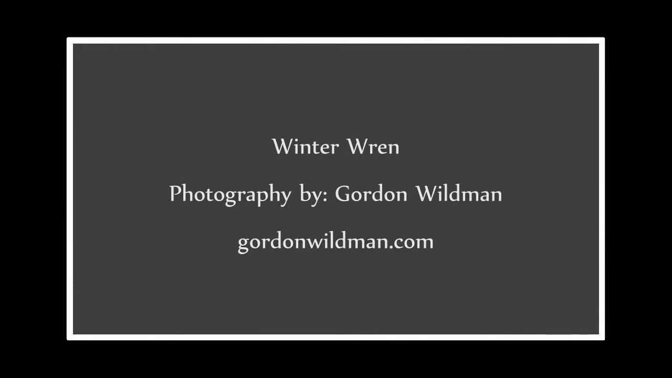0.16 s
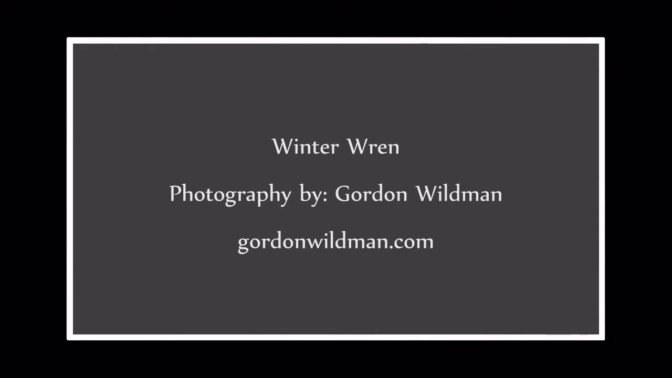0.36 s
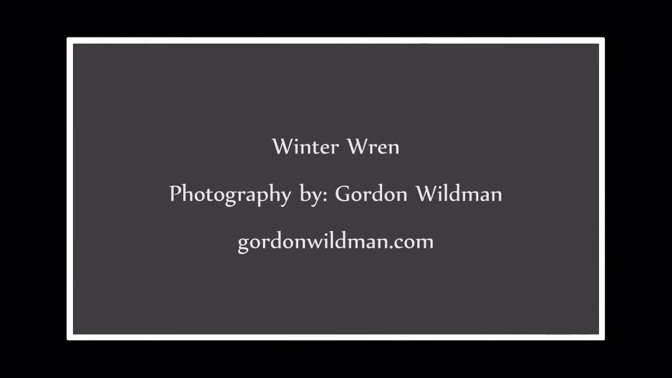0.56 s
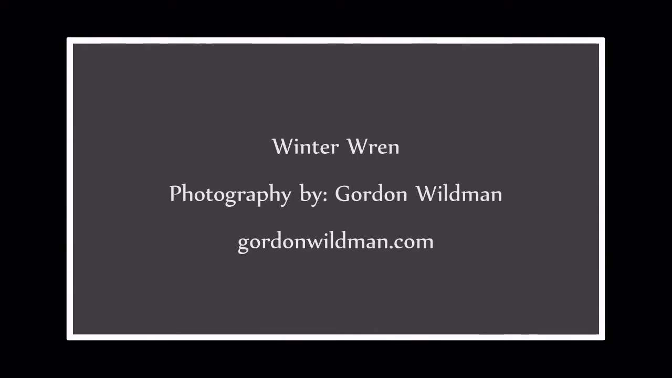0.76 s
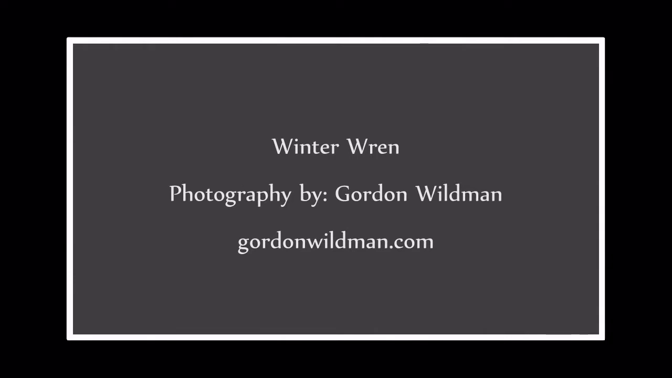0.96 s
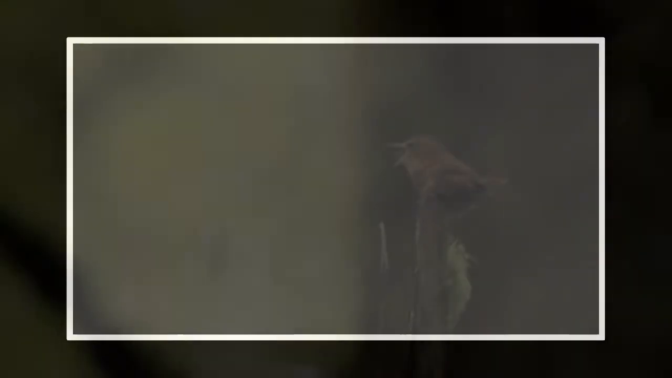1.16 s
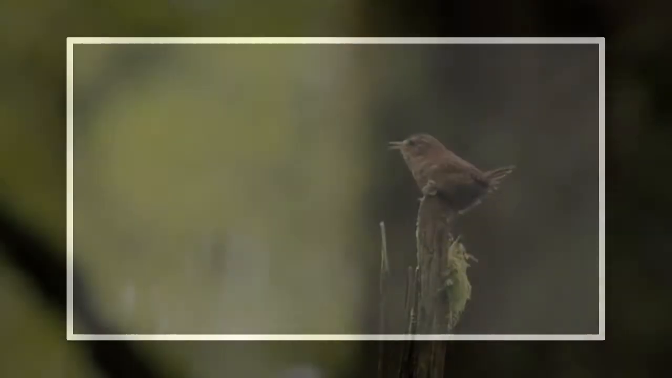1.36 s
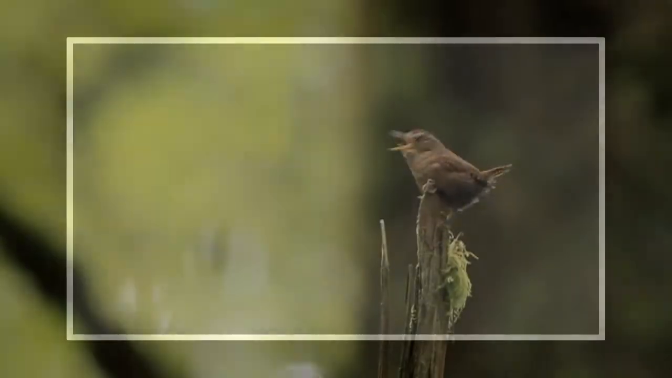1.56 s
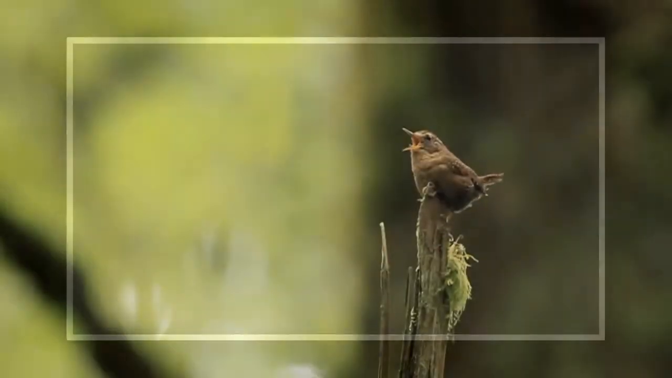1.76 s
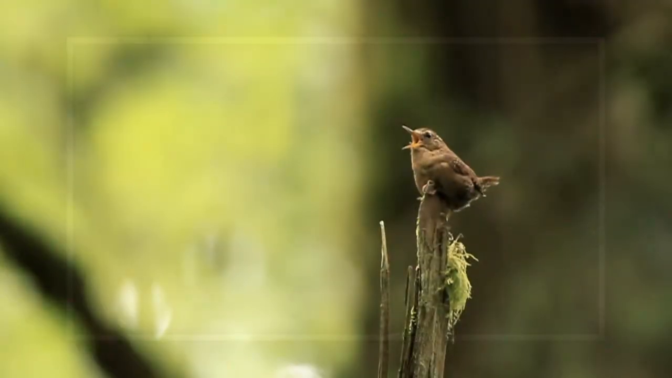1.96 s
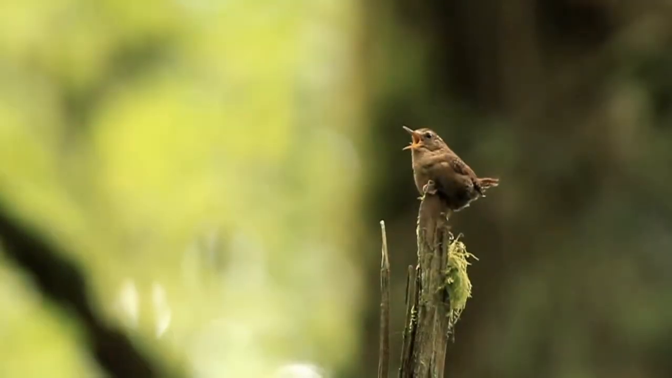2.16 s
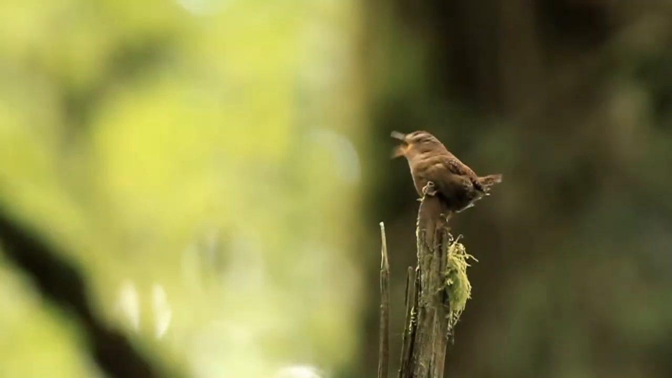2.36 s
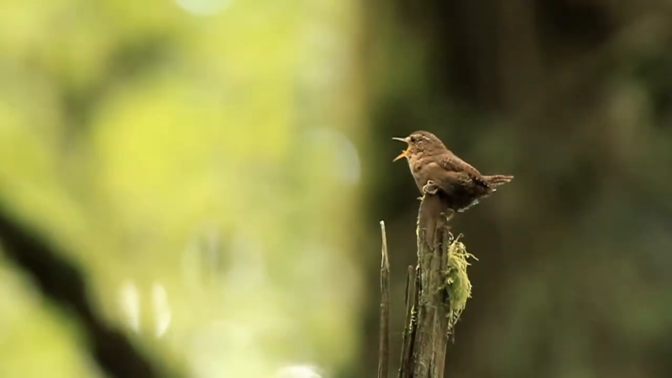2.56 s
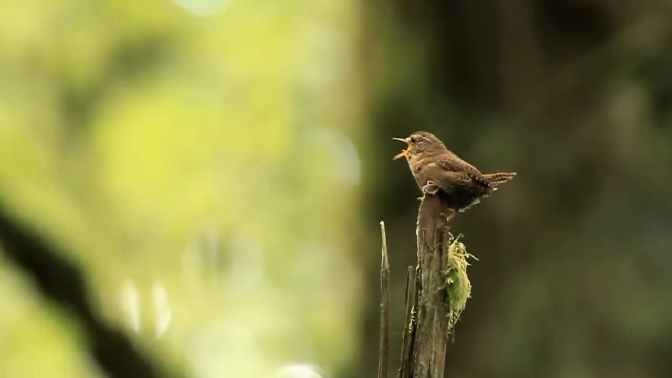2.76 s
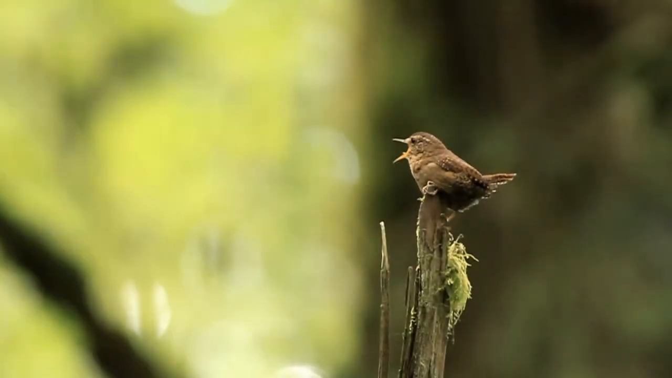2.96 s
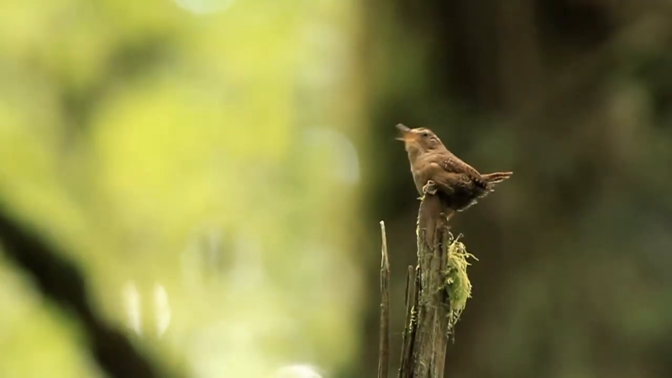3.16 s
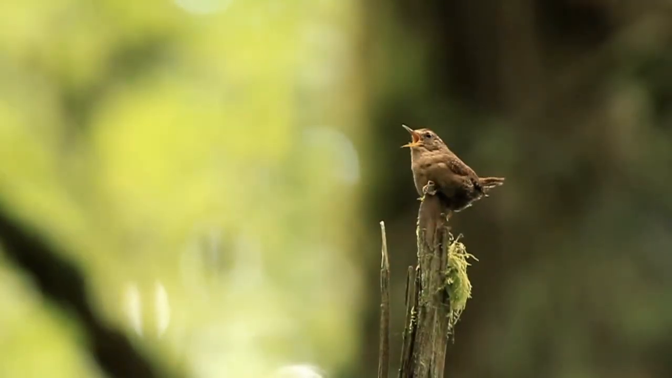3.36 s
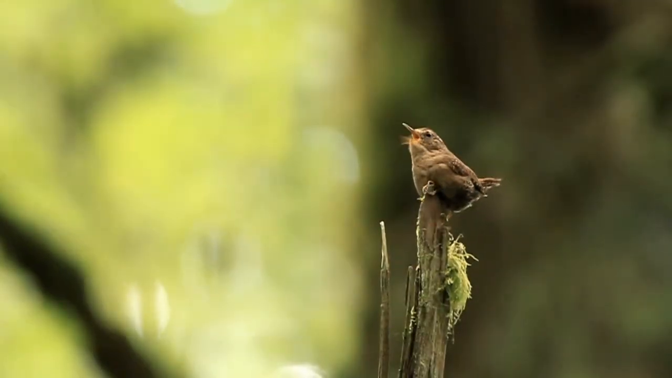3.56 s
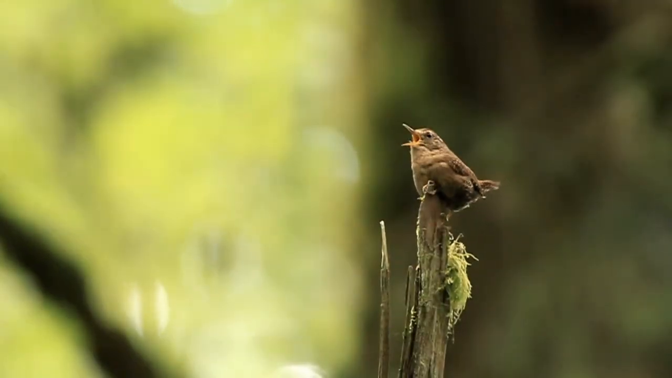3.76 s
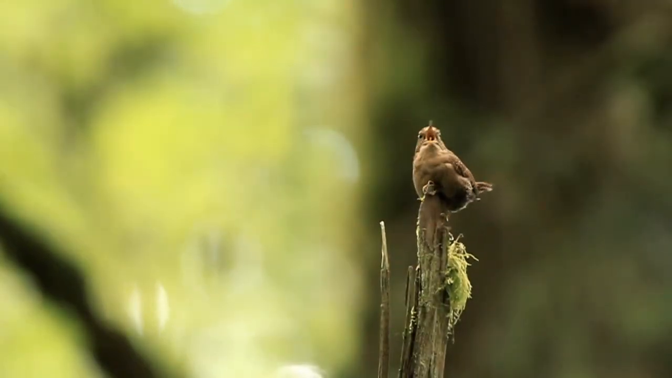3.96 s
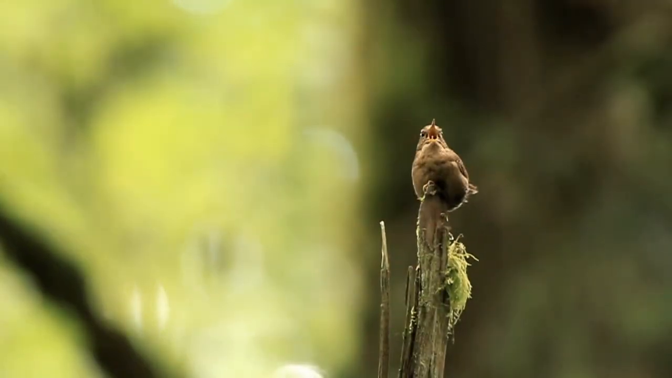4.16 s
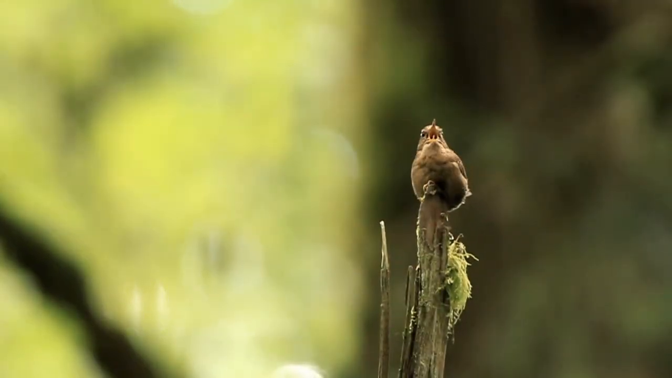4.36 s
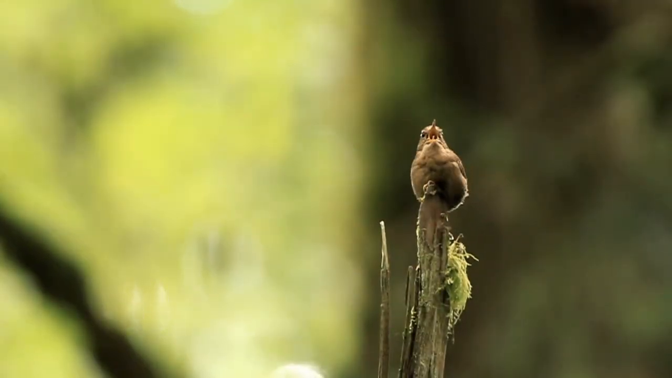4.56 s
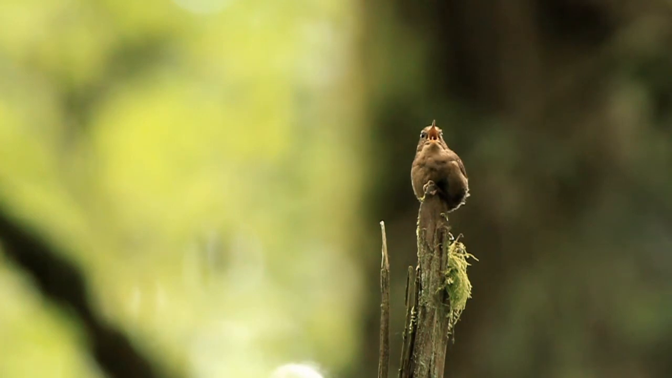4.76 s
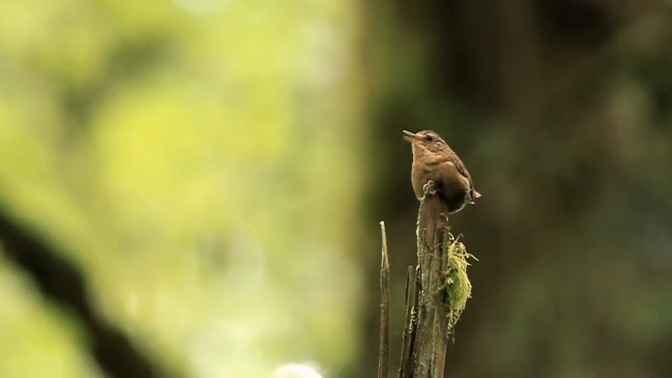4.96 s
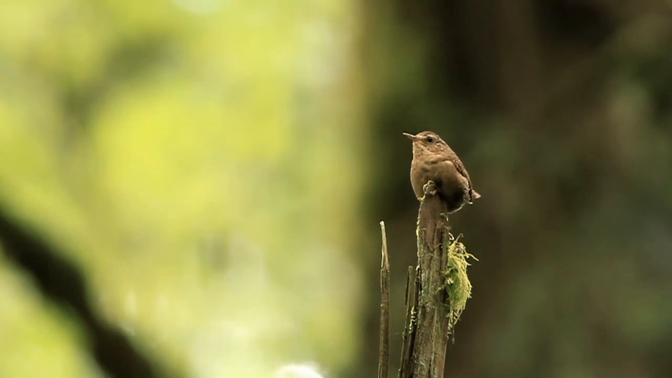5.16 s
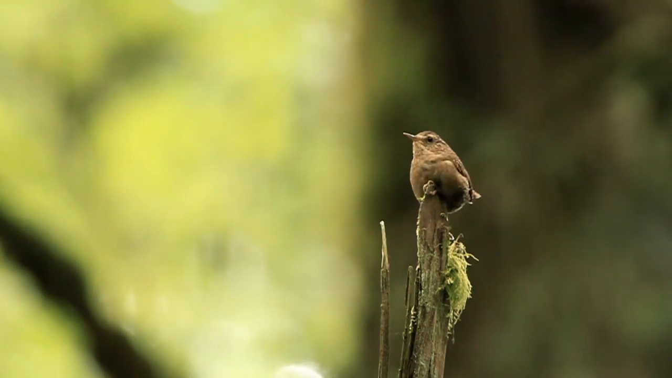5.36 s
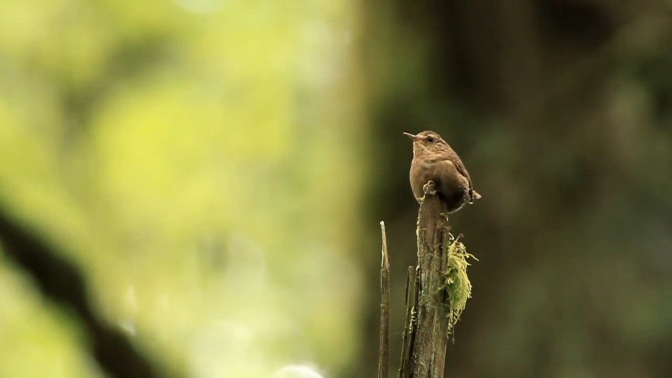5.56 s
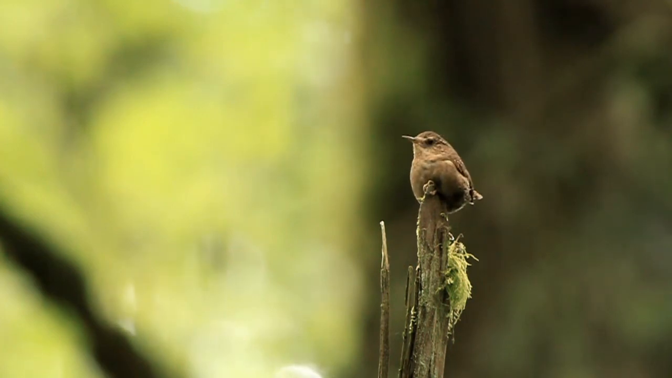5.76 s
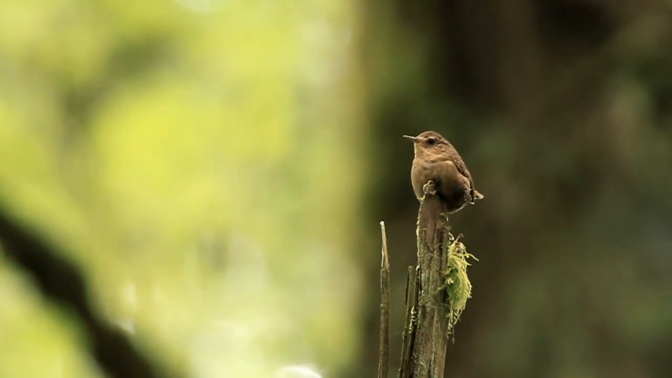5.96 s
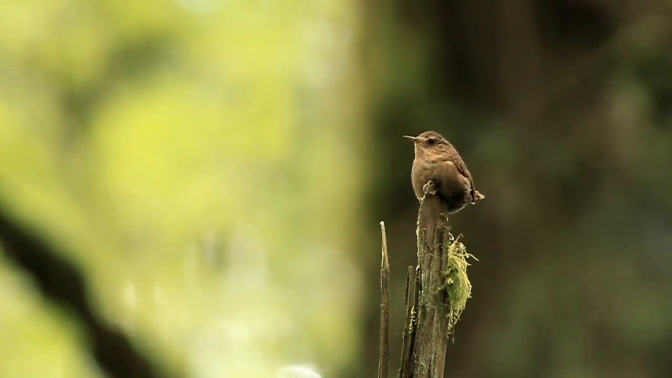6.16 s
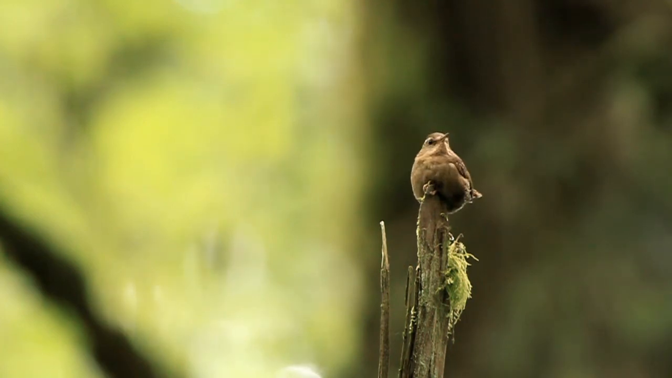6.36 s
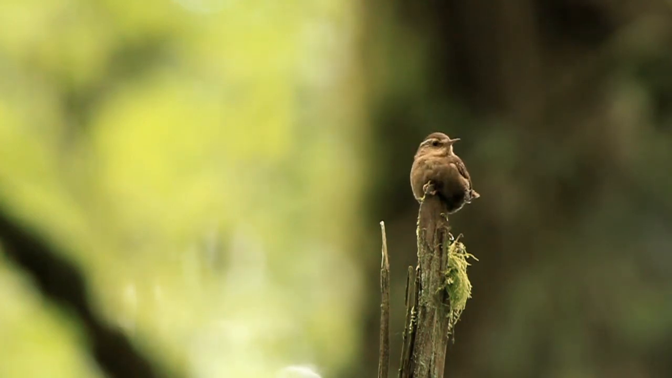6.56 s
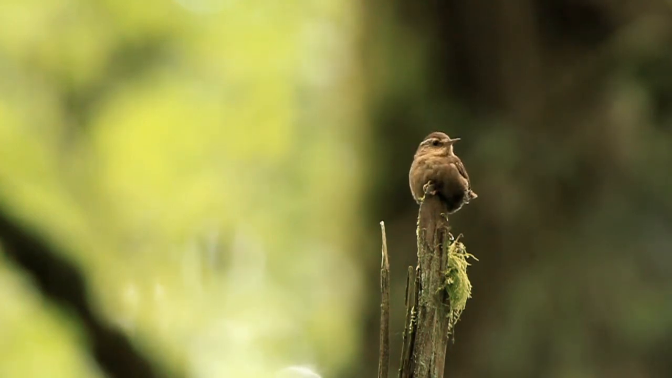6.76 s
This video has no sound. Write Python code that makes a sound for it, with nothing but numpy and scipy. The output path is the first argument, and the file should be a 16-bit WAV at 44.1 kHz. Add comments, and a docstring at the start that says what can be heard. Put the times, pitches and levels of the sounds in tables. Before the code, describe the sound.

Silence opens suddenly with a click at right into quiet forest air. A single small bird sings loudly and brilliantly, dozens of sharp sweeping notes a second or so apart in phrases: scattered chips, a steady roll, quick trills, and a slower closing roll. Woodland scatter leaves a short airy tail. After it ends, faint hiss remains with two soft far bird notes, a vague low rumble, a tick and a small mechanical whir. Mono-like outdoor pickup.

```python
"""After about 1 s of silence the sound opens abruptly, with a pop on the right and a faint hiss, on a wren's song.
The wren sings swept near-sine syllables, chips, rolls, trills and two fluttered buzzes; echoes and decaying
noise scatter them back as trunks would. Two soft motor whirs, noise with unsteady tones, start during the song.
Then a far bird gives two blurred slurs, a low rumble comes and goes, a noise burst ticks and a third whir runs."""
import sys
import numpy as np
from scipy import signal
from scipy.fft import rfft, irfft
from scipy.io import wavfile
from scipy.ndimage import uniform_filter1d

SR = 44100
rng = np.random.default_rng(int(sys.argv[2]) if len(sys.argv) > 2 else 0)


def transcribe(u):
    """Save the signal u as a 16-bit wav file named by the first command-line argument.

    u: samples, shape (n,) or (channels, n), limited to [-1, 1]; the rate is SR.
    q: integer samples, one column per channel.
    """
    v = np.clip(np.atleast_2d(u).T, -1, 1)
    q = np.round(v * 32767).astype(np.int16)
    wavfile.write(sys.argv[1], SR, q)


N = 300071
TIME = np.arange(N) / SR


def from_db(db):
    """Decibels to gain."""
    return 10 ** (np.asarray(db) / 20)


def rms_one(x):
    """Scale to an rms of 1."""
    return x / np.sqrt(np.mean(x ** 2) + 1e-20)


def drift(rate_hz):
    """Random fluctuation below rate_hz, rms 1."""
    lowpass = signal.butter(2, rate_hz, fs=SR, output="sos")
    return rms_one(signal.sosfilt(lowpass, rng.standard_normal(N)))


def noise(spectrum):
    """Steady noise shaped by a (f/Hz, level/dB) spectrum, rms 1."""
    hz, db = np.transpose(spectrum)
    bins_hz = np.maximum(np.fft.rfftfreq(N, 1 / SR), 1)
    gain = from_db(np.interp(np.log(bins_hz), np.log(hz), db))
    return rms_one(irfft(rfft(rng.standard_normal(N)) * gain, N))


def gate(start_s, end_s, fade_s):
    """1 between start and end, with straight fades inside."""
    return np.clip(np.minimum(TIME - start_s, end_s - TIME) / fade_s, 0, 1)


def progress(length_s):
    """Runs from 0 to 1 over a note."""
    return np.linspace(0, 1, max(int(length_s * SR), 2))


def envelope(length_s, attack_s, release_s):
    """Straight attack, hold and release of a note."""
    t = progress(length_s) * length_s
    return np.clip(np.minimum(t / attack_s, (length_s - t) / release_s), 0, 1)


def slur(start_s, length_s, first_hz, middle_hz, last_hz, fade_s, db):
    """The pitch bends once, along a parabola. Every note is (start, pitch, strength)."""
    bend = np.polyfit([0, .5, 1], [first_hz, middle_hz, last_hz], 2)
    hz = np.polyval(bend, progress(length_s))
    return start_s, hz, from_db(db) * envelope(length_s, fade_s, fade_s)


def whistle(start_s, length_s, turn_a_s, turn_b_s, first_hz, a_hz, b_hz, last_hz, db,
            attack_s=.010, release_s=.005, rounding_s=.008, max_sag=.09):
    """Three glides joined by rounded turns; low air pressure sags the pitch at onset and release."""
    pressure = envelope(length_s, attack_s, release_s)
    t = progress(length_s) * length_s
    hz = np.interp(t, [0, turn_a_s, turn_b_s, length_s], [first_hz, a_hz, b_hz, last_hz])
    hz = uniform_filter1d(hz, int(rounding_s * SR), mode="nearest")
    sag = max_sag * (1 - pressure) ** 2
    return start_s, hz * (1 - sag), from_db(db) * pressure


CHIP_TURN_SHARE = .35  # share of the chip before its pitch turns


def chip(start_s, length_s, top_hz, bottom_hz, db, bow=.8, down_db=-5, turn_db=-25):
    """The pitch plunges and springs back; the syrinx nearly closes at the turn."""
    u, turn = progress(length_s), CHIP_TURN_SHARE
    height = np.interp(u, [0, turn, 1], [1, 0, 1]) ** bow  # bow < 1: sharper V
    # downstroke and turn levels are relative to the upstroke
    strokes = np.interp(u, [0, turn / 2, turn, (1 + turn) / 2, 1],
                        [0, from_db(down_db), from_db(turn_db), 1, 0])
    return start_s, bottom_hz + (top_hz - bottom_hz) * height, from_db(db) * strokes


def repeated(motif, beats):
    """The same few notes on every beat, each beat with its own pitch ratio and gain."""
    notes = []
    for beat_s, pitch_ratio, gain_db in beats:
        for start_s, hz, strength in motif:
            notes.append((beat_s + start_s, pitch_ratio * hz, from_db(gain_db) * strength))
    return notes


# All note levels are relative, before the beak and voice gains.
# Slurs sung once: t/s, length/s, first f/Hz, middle f/Hz, last f/Hz, fade/s, level/dB
SINGLE_SLURS = [ (.984, .049, 8100, 6050, 3850, .007, -14.5), (1.052, .007, 5500, 6050, 6300, .003, -20),
                (1.062, .007, 6000, 6100, 5900, .003, -14), (1.189, .006, 5800, 6350, 6400, .003, -12),
                (1.199, .007, 6300, 6620, 6600, .003, -13), (1.337, .036, 3280, 3230, 2600, .013, -12.5),
                (1.371, .014, 2900, 3560, 3500, .006, -15), (1.495, .032, 4500, 4050, 3950, .005, -12.5),
                (1.573, .008, 5300, 4200, 3400, .003, -14), (1.582, .007, 4300, 3500, 3000, .003, -18),
                (1.592, .007, 4700, 3850, 3350, .003, -13), (1.601, .014, 4100, 4700, 4450, .004, -12),
                (1.672, .084, 7600, 7620, 7350, .012, -13), (1.779, .009, 5200, 7000, 7650, .004, -8),
                (1.788, .023, 7750, 7550, 6700, .008, -12), (1.932, .021, 6500, 8100, 7950, .005, -12),
                (2.074, .021, 6500, 8150, 8000, .005, -13), (2.217, .031, 4100, 3830, 3430, .003, -12),
                (2.263, .054, 3800, 4560, 4050, .027, -4), (2.446, .032, 5400, 5130, 6000, .011, -9),
                (3.036, .017, 5050, 4350, 4100, .003, -14), (3.056, .016, 3900, 4750, 4500, .006, -7),
                (3.073, .026, 4200, 4050, 3450, .008, -13.5), (3.113, .017, 4300, 3950, 3350, .005, -12),
                (3.133, .018, 4100, 4680, 4000, .005, -12), (3.155, .023, 4050, 3750, 3400, .006, -18),
                (3.295, .008, 5400, 6200, 6500, .004, -11), (3.305, .006, 6400, 5900, 5100, .003, -19),
                (3.407, .017, 4480, 4250, 3750, .005, -11), (3.428, .088, 4200, 4500, 4850, .008, -23),
                (3.5365, .010, 4500, 5480, 4700, .004, -4.5), (3.549, .022, 4950, 4300, 3700, .005, -5.7),
                (3.575, .017, 4300, 4980, 5350, .003, -9.5), (4.038, .039, 6700, 5650, 4350, .02, -7),
                (4.101, .049, 6550, 7530, 5700, .009, -7.8), (4.156, .024, 7600, 7300, 6300, .012, -13)]
# Whistles sung once: t/s, length/s, turn A after/s, turn B after/s, first f/Hz, A f/Hz, B f/Hz, last f/Hz,
# level/dB; pitches before rounding and sag
SINGLE_WHISTLES = [ (1.089, .082, .018, .032, 7900, 6550, 7900, 3850, -12.5),
                   (1.226, .089, .021, .034, 7750, 6750, 8400, 4200, -13),
                   (1.406, .069, .036, .052, 5500, 6350, 7450, 5600, -12.5),
                   (1.541, .031, .013, .023, 4750, 5000, 5550, 3550, -11.5),
                   (1.640, .040, .009, .024, 9300, 7500, 8450, 7600, -7),
                   (2.351, .077, .041, .057, 7100, 7050, 7550, 5900, -13.3),
                   (2.805, .092, .034, .056, 7850, 7800, 8200, 6500, -13.5),
                   (2.962, .047, .009, .022, 6950, 6300, 7250, 6300, -14),
                   (3.200, .077, .022, .052, 5400, 7000, 4300, 5900, -8.5),
                   (3.329, .056, .013, .027, 6300, 8950, 6800, 8000, -9),
                   (3.610, .068, .021, .039, 6600, 9050, 7250, 8200, -10)]
# Lone chip: t/s, length/s, top f/Hz, bottom f/Hz, level/dB
SINGLE_CHIP = (2.937, .017, 7700, 5400, -8)


def singles():
    """Notes the syrinx sings once: slurs, whistles and a chip."""
    slurs = [slur(*row) for row in SINGLE_SLURS]
    whistles = [whistle(*row) for row in SINGLE_WHISTLES]
    return slurs + whistles + [chip(*SINGLE_CHIP)]


# Motifs: columns as for single notes, t/s after the beat; pitch and level before the beat's ratio and gain.
# Chip of the early roll: t/s, length/s, top f/Hz, bottom f/Hz, level/dB
EARLY_ROLL_CHIP = (0, .022, 8100, 4600, -6)
# Arching whistle: t/s, length/s, turn A/s, turn B/s, first f/Hz, A f/Hz, B f/Hz, last f/Hz, level/dB
EARLY_ROLL_ARCH = (.0385, .064, .018, .034, 8050, 7800, 8550, 7000, -8)
# Beats: t/s, pitch ratio, gain/dB
EARLY_ROLL_BEATS = [(1.810, 1, 1), (1.9515, 1, 0), (2.0935, .995, -.5)]


def early_roll():
    """Chip and arching whistle on every beat."""
    return repeated([chip(*EARLY_ROLL_CHIP), whistle(*EARLY_ROLL_ARCH)], EARLY_ROLL_BEATS)


# Slurs: t/s after the beat, length/s, first f/Hz, middle f/Hz, last f/Hz, fade/s, level/dB
TWO_SLUR_TRILL_SLURS = [(.001, .012, 3900, 5800, 4600, .006, -14.5),
                        (.016, .017, 7750, 7100, 6000, .006, -16.5)]
# Beats: t/s, pitch ratio, gain/dB
TWO_SLUR_TRILL_BEATS = [(2.4955, 1.02, .5), (2.539, 1.05, 1), (2.580, 1, 2), (2.6215, 1.04, -.5),
                        (2.6645, 1.03, 0), (2.708, 1, 1), (2.752, 1.01, -1.5)]


def two_slur_trill():
    """Two slurs on every beat."""
    return repeated([slur(*row) for row in TWO_SLUR_TRILL_SLURS], TWO_SLUR_TRILL_BEATS)


# Slurs: t/s after the beat, length/s, first f/Hz, middle f/Hz, last f/Hz, fade/s, level/dB
THREE_SLUR_TRILL_SLURS = [(.0015, .008, 5700, 6850, 7100, .002, -10.3),
                          (.0095, .009, 7400, 6800, 5100, .002, -11.3),
                          (.02, .016, 8050, 7680, 7200, .007, -10)]
# Beats: t/s, pitch ratio, gain/dB
THREE_SLUR_TRILL_BEATS = [(3.6945, 1.01, 1.5), (3.7445, 1.013, 0), (3.7935, .99, 1), (3.841, 1.003, .5),
                          (3.8895, 1, 1.5), (3.9385, .98, 1), (3.9875, .98, .5)]


def three_slur_trill():
    """Three slurs on every beat."""
    return repeated([slur(*row) for row in THREE_SLUR_TRILL_SLURS], THREE_SLUR_TRILL_BEATS)


# Lead-in slur: t/s after the beat, length/s, first f/Hz, middle f/Hz, last f/Hz, fade/s, level/dB
CLOSING_ROLL_SLUR = (0, .011, 5700, 7100, 7550, .005, -13.5)
# First chip, the deepest: t/s, length/s, top f/Hz, bottom f/Hz, level/dB
CLOSING_ROLL_CHIP = (.017, .020, 7650, 3900, -7.5)
# Arching whistle: t/s, length/s, turn A/s, turn B/s, first f/Hz, A f/Hz, B f/Hz, last f/Hz, level/dB
CLOSING_ROLL_ARCH = (.036, .066, .012, .028, 9350, 8050, 8750, 7200, -12.3)
# Beats: t/s, pitch ratio, gain/dB
CLOSING_ROLL_BEATS = [(4.2065, .995, 0), (4.328, 1, 1), (4.4475, 1, .5), (4.566, 1.025, .5), (4.693, 1, 0),
                      (4.8135, .985, 0)]


def closing_roll(lift_hz=210):
    """Slur, chip and arch on every beat; the chips grow shallower towards the end, and so shorter."""
    start_s, length_s, top_hz, deepest_hz, db = CLOSING_ROLL_CHIP
    notes = []
    for k, beat in enumerate(CLOSING_ROLL_BEATS):
        bottom_hz = deepest_hz + k * lift_hz  # before the beat's pitch ratio
        saved_s = length_s * (bottom_hz - deepest_hz) / (top_hz - deepest_hz)
        chip_start_s = start_s + saved_s * CHIP_TURN_SHARE
        shallower = chip(chip_start_s, length_s - saved_s, top_hz, bottom_hz, db)
        notes += repeated([slur(*CLOSING_ROLL_SLUR), shallower, whistle(*CLOSING_ROLL_ARCH)], [beat])
    return notes


def song():
    """All the wren's notes: single ones, two rolls and two trills."""
    return singles() + early_roll() + two_slur_trill() + three_slur_trill() + closing_roll()


# Syrinx flutter in the buzzes: start t/s, end t/s, rate/Hz, pitch swing/Hz, level swing/0-1
SYRINX_FLUTTER = [(1.662, 1.764, 205, 560, 0.08), (3.424, 3.52, 178, 453, 0.75)]
# Throat and beak response, favouring mid-range: f/Hz, level/dB
BEAK_RESPONSE = [(2700, -10), (3300, -6.5), (4000, -6.5), (4700, -3), (5500, -1.8), (6300, -1.8),
                 (7000, -4.3), (8000, -6.3), (8700, -13)]


def wren(jitter=0.006, shimmer_db=1.9, octave_db=-30, octave_tilt_db=12, octave_rough_rad=0.6, voice_db=-0.45):
    """The syrinx gives a near sine with a faint, rougher octave; buzzes are loudest as the pitch swings down."""
    swing_hz, pulsing, out = np.zeros(N), np.ones(N), np.zeros(N)
    for start_s, end_s, rate_hz, depth_hz, share in SYRINX_FLUTTER:
        cycle = 2 * np.pi * rate_hz * (TIME - start_s)
        on = gate(start_s, end_s, 0.01)
        swing_hz += on * depth_hz * np.cos(cycle)
        pulsing += on * share * np.sin(cycle)
    waver = 1 + jitter * drift(350)
    tremor = from_db(shimmer_db * drift(192))
    rasp_rad = octave_rough_rad * drift(1500)
    for start_s, hz, strength in song():
        at = int(start_s * SR) + np.arange(len(hz))
        phase = 2 * np.pi * np.cumsum(hz * waver[at] + swing_hz[at]) / SR
        # the microphone resonates high up, so the octave is stronger on high notes
        octave_gain = from_db(octave_db + octave_tilt_db * np.log2(hz / 7000))
        octave = octave_gain * np.sin(2 * phase + rasp_rad[at])
        beak_gain = from_db(np.interp(hz, *np.transpose(BEAK_RESPONSE)))
        out[at] += strength * beak_gain * (np.sin(phase) + octave)
    return from_db(voice_db) * out * pulsing * tremor


def scatter(x, t60_s, build_s, air_t60=(1, 1, 1)):
    """Countless small reflections build up and die away; air_t60 scales the decay per band."""
    t, response = TIME[:SR], 0
    for band_hz, share in zip([(1500, 5000), (5000, 8000), (8000, 16000)], air_t60):
        bandpass = signal.butter(4, band_hz, "band", fs=SR, output="sos")
        grain = signal.sosfilt(bandpass, rng.standard_normal(SR))
        decay = from_db(-60 * t / (t60_s * share))
        response = response + grain * decay * (1 - np.exp(-t / build_s))
    unit_energy = response / np.sqrt(np.sum(response ** 2))
    return signal.fftconvolve(x, unit_energy)[:N]


# Near reflections from stump, ground and trunks: delay/s, level/dB
NEAR_ECHOES = [(.0023, -16), (.0068, -18), (0.0145, -22), (.034, -17)]


def forest(x, thicket_db=-13, trunks_db=-16.5):
    """Direct sound, near echoes, short thicket scatter and longer trunk scatter whose top the air absorbs."""
    near = np.zeros(N)
    for delay_s, db in NEAR_ECHOES:
        near += from_db(db) * np.r_[np.zeros(int(delay_s * SR)), x][:N]
    thicket = from_db(thicket_db) * scatter(x, t60_s=0.16, build_s=0.0064)
    trunks = from_db(trunks_db) * scatter(x, t60_s=0.75, build_s=0.029, air_t60=(1.2, .98, .8))
    return x + near + thicket + trunks


# Hiss colour: f/Hz, relative level/dB per Hz
HISS_COLOUR = [(18, -49), (30, -35), (60, -5), (100, -7.5), (140, -4.5), (195, -1.7), (260, -5),
               (400, -7.5), (600, -8.5), (1000, -9.5), (2900, -11.5), (5000, -18), (6700, -24),
               (13000, -26)]
# Slow swell, relative to level_db: t/s, level/dB
HISS_SWELL_DB = [(1, 1), (1.6, 1), (2.2, 0), (2.4, -2.5), (2.9, -0.5), (3.2, 1.5), (4.2, -1), (4.6, 0.6),
                 (5.2, -0.4), (6.8, -0.5)]


def hiss(level_db=-45, top_hz=13000):
    """Forest air and microphone noise: coloured noise, swelling a little, rolled off at the top."""
    lowpass = signal.butter(10, top_hz, fs=SR, output="sos")
    air = signal.sosfilt(lowpass, noise(HISS_COLOUR))
    swell_db = np.interp(TIME, *np.transpose(HISS_SWELL_DB))
    return from_db(level_db + swell_db) * air


# Motor runs: start t/s, end t/s, rms level/dB
MOTOR_RUNS = [(2.994, 3.5, -53.5), (4.38, 4.81, -52), (6.358, 6.85, -49.5)]
# Gear noise colour: f/Hz, relative level/dB
GEAR_COLOUR = [(1200, -17), (1900, -0.5), (2500, -2.5), (3300, -4.5), (3800, -3), (4300, -20), (5700, -9),
               (8000, -28)]
# Motor tones: start t/s, end t/s, mean f/Hz, peak level/dB
MOTOR_TONES = [(3.024, 3.48, 2320, -54), (4.423, 4.81, 1965, -53), (4.4, 4.8, 3400, -53),
               (6.364, 6.85, 2993, -54), (6.368, 6.85, 3230, -55.5), (6.366, 6.85, 3750, -55)]


def motor(wobble_hz=4):
    """Short runs of gear noise with a few tones of randomly wobbling pitch."""
    running = sum(from_db(db) * gate(start_s, end_s, 0.005) for start_s, end_s, db in MOTOR_RUNS)
    out = noise(GEAR_COLOUR) * running
    for start_s, end_s, hz, db in MOTOR_TONES:
        phase = 2 * np.pi * np.cumsum(hz + wobble_hz * drift(59.3)) / SR
        out += from_db(db) * gate(start_s, end_s, 0.018) * np.sin(phase)
    return out


# Two slurs: t/s, length/s, first f/Hz, middle f/Hz, last f/Hz, fade/s, level/dB before the direct/scatter mix
FAR_SLURS = [(5.07, .06, 2400, 2850, 3350, .022, -39), (5.2, .105, 2550, 2130, 1950, .05, -45)]


def far_bird(direct=0.7, scattered=0.5):
    """Two swept sines, blurred by scatter from the trees."""
    call = np.zeros(N)
    for row in FAR_SLURS:
        start_s, hz, strength = slur(*row)
        at = int(start_s * SR) + np.arange(len(hz))
        call[at] += strength * np.sin(2 * np.pi * np.cumsum(hz) / SR)
    return direct * call + scattered * scatter(call, t60_s=0.39, build_s=0.002)


# Rumble colour: f/Hz, relative level/dB per Hz
RUMBLE_COLOUR = [(50, -30), (110, -9), (155, 1), (210, -9), (400, -52)]


def rumble(level_db=-56):
    """Far, low noise fades in and out after the song."""
    return from_db(level_db) * gate(5.18, 6.9, 0.65) * noise(RUMBLE_COLOUR)


# Tick: t/s, level/dB
TICK_EVENT = (5.757, -32)


def tick(width_s=0.0022):
    """One faint, bright noise burst under a Gaussian envelope."""
    centre_s, db = TICK_EVENT
    # f/Hz, relative level/dB
    colour = [(500, -22), (1500, -6), (4300, -7.5), (5000, -2), (8000, -6), (10000, -7),
              (13500, -14), (15000, -35)]
    burst = np.exp(-((TIME - centre_s) / width_s) ** 2)
    return from_db(db) * burst * noise(colour)


def scene():
    """All sources sum at one microphone, the same in both ears."""
    mono = forest(wren()) + hiss() + motor() + far_bird() + rumble() + tick()
    return np.array([mono, mono])


def record(dry, open_s=.988, right_offset=.11, cutoff_hz=15800):
    """Until open_s the right channel rests at a silent offset, so it opens with a pop; the top is cut."""
    opened = np.where(TIME >= open_s, dry, [[0], [right_offset]])
    lowpass = signal.ellip(10, .1, 70, cutoff_hz, fs=SR, output="sos")
    return signal.sosfiltfilt(lowpass, opened)


dry = scene()
out = record(dry)
transcribe(out)
```